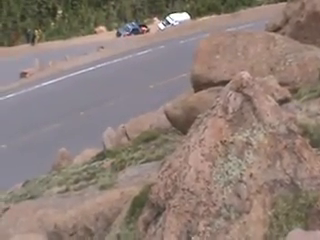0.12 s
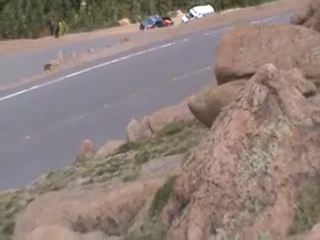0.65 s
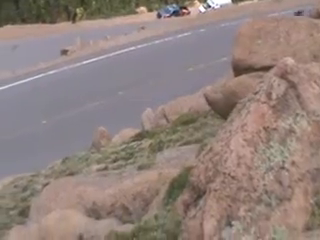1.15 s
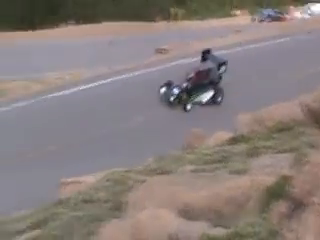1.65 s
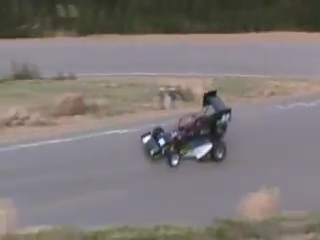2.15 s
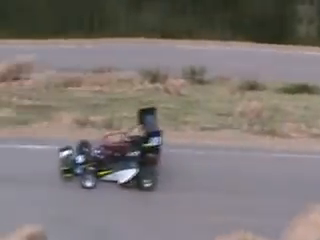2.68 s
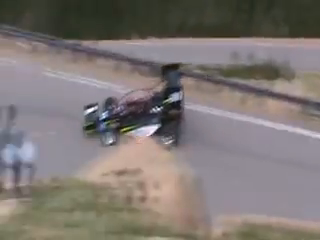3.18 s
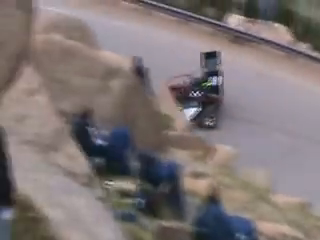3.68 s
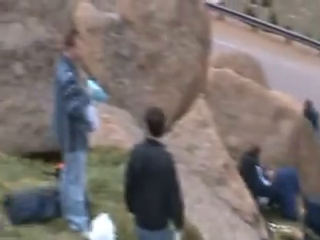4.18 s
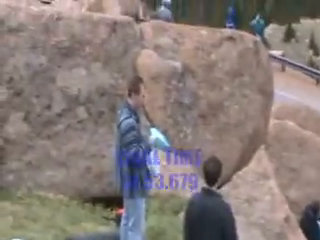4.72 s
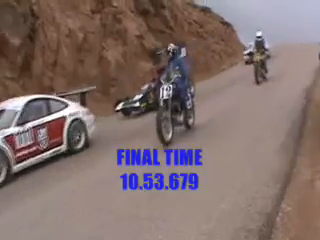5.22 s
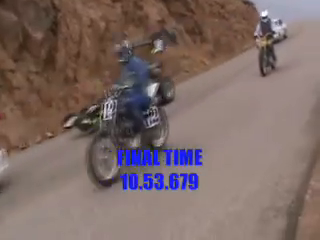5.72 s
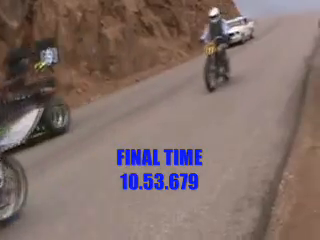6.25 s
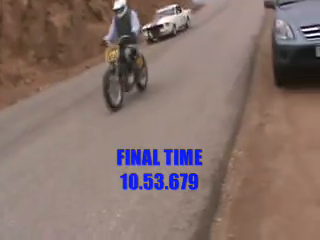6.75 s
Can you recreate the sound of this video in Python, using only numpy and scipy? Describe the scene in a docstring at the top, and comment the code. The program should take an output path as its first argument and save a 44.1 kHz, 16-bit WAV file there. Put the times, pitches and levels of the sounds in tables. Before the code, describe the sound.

Open air beside a mountain road, handheld stereo microphone with a dull top end. From 0 s a race engine drones, muffled behind rocks, under low wind thumps strongest until about 1.5 s. It grows louder and brighter from 1.2 s, a hard rasp with pulsing exhaust hiss, its pitch climbing to 2.26 s. At 2.3 s it drops abruptly in a downshift; crackles snap at 2.6 s, thin whines slide downward and the revs sink to a rough growl near 3.5 s. From 3.7 s it pulls again, rising, with a crackle at 4.06 s, then dulls away as wind buffets around 4.5 s. Near-silence from 4.7 to 5.04 s. Then a slow car's low drone and a puttering motorcycle pass close, exhaust pops clustered at 5.1-5.4 s, with steady road rumble and hiss. Gravel ticks from 6.2 s, one sharp snap at 6.6 s, ending about 6.87 s.

```python
"""A race car brakes into a hairpin below a rocky bank, changes down and pulls away; wind puffs on the microphone.
After a short silent cut, a car and motorcycles cruise slowly past at close range with a low drone.
Engines are sums of orders with scattered phases; the race car's upper orders pass through pipe resonances.
Gas, wind and road are coloured noise; backfires and stones are noise bursts, pops and stone rings resonances."""
import sys
import numpy as np
from scipy import signal
from scipy.fft import rfft, irfft, next_fast_len
from scipy.io import wavfile
from scipy.ndimage import uniform_filter1d

SR = 44100
rng = np.random.default_rng(int(sys.argv[2]) if len(sys.argv) > 2 else 0)


def bounce(signal):
    """Save signal as a 16-bit WAV file at the path given by the first command-line argument."""
    frames = np.transpose(np.atleast_2d(signal))
    limited = np.clip(frames, -1, 1)
    pcm = np.round(limited * 32767).astype(np.int16)
    wavfile.write(sys.argv[1], SR, pcm)


def amplitude_ratio(level_db):
    """Convert a level in decibels to the matching linear amplitude (field) ratio."""
    exponent = np.asarray(level_db, float) / 20
    return 10 ** exponent


N = 302967
TIME = np.arange(N) / SR
CONTROL_S = TIME[::16]   # times of the slow controls
CUT_OUT_S, CUT_IN_S = 4.713, 5.0445
HALVES = np.array([[.5], [-.5]])   # splits a left-right difference over the channels

# left-right balance: (time [s], middle L-R [dB], treble L-R [dB])
PAN = [(0, -3.5, -1), (2.4, -3, 0), (4.2, -2.5, -1), (4.71, -1.5, 2), (5.05, 3.5, 4.5), (5.68, 0.5, 2.5),
       (6.87, 3.5, 2.5)]
# how loud the race car arrives: (time [s], pipe level [dB], hiss gain [dB], treble gain [dB])
PASSING = [(0, -45, -42, -64), (.14, -38, -33, -66), (.3, -39, -35, -59), (.44, -35, -38, -51.5),
           (.64, -24.5, -35, -52.5), (1.0, -26.5, -30.5, -45), (1.17, -27.5, -29.5, -35.5),
           (1.4, -21, -28.5, -40.5), (1.8, -27, -26, -32.5), (1.97, -24.5, -25.5, -30.5),
           (2.25, -25.5, -26.5, -30), (2.52, -28, -26, -28.5), (2.68, -24.5, -25.5, -28.5),
           (3.3, -26, -25, -25.5), (3.6, -25, -24.5, -29.5), (3.8, -22, -25, -25.5),
           (3.93, -25.5, -26.5, -26), (4.12, -21.5, -29, -29.5), (4.45, -28, -36.5, -37),
           (4.71, -28, -36, -36)]


def rms_one(x):
    """Scale to unit power."""
    return x / np.sqrt(np.mean(x ** 2) + 1e-20)


def in_time(rows, t=TIME):
    """Columns of a curve table read at times t."""
    s, *columns = np.transpose(rows)
    return [np.interp(t, s, c) for c in columns]


def at_hz(points, hz):
    """A spectrum read on a log-frequency axis."""
    points_hz, values = np.transpose(points)
    return np.interp(np.log(hz), np.log(points_hz), values)


def smooth(coarse, size):
    """A slow control read at every sample."""
    return uniform_filter1d(np.repeat(coarse, 16, axis=-1), size=16, axis=-1)[..., :size]


def drift(rate_hz, size=N, step=40):
    """Slow chance: noise twice through a one-pole low-pass, spread 1."""
    r = np.exp(-2 * np.pi * step * rate_hz / SR)
    noise = rng.standard_normal(N // step + 2002)
    slow = signal.lfilter([1], [1, -2 * r, r * r], noise)[2000:]   # skip the start-up
    return np.interp(np.linspace(0, N / step, size), np.arange(len(slow)), rms_one(slow))


def coarse_drift(rate_hz, count):
    """Slow chance at the control rate."""
    return drift(rate_hz, size=N // 16 + 1)[:count]


def orders(turns, levels_db, scatter, flutter_db, lead_rad):
    """One partial per engine order; uneven firing scatters the phases, the air path shakes the levels."""
    out, size = np.zeros((2, len(turns))), len(turns)
    timing = drift(20, size=N // 16 + 1)   # early or late firing moves all orders together
    strength = drift(14, size=N // 16 + 1)   # strong and weak firings come in uneven runs
    for order, level_db in levels_db:
        count = len(level_db)
        flutter, jitter, path = [coarse_drift(rate_hz, count) for rate_hz in (5, 28, 3)]
        # high orders feel timing errors most
        jitter = scatter * (.85 * np.sqrt(order / 15) * jitter + .4 * order / 15 * timing[:count])
        apart = (lead_rad + 0.25 * path) * HALVES   # the two ports hear slightly different paths
        # from order 18 up the rasp pulses between the barks; low orders stay out of the pulse
        offset_turns = .45 * max(order - 17, 0)
        offset_turns += rng.normal(0, .06 + (order / 60) ** 2 + .2 * (order < 10))
        phase = smooth(jitter + apart, size) + 2 * np.pi * ((order * turns + offset_turns) % 1)
        shake_db = flutter_db * min(order / 15 + .3, 1.3) * flutter   # low orders hold steadier
        shake_db = shake_db + 3.0 * (order >= 10) * np.sqrt(scatter) * strength[:count]
        level = smooth(np.sqrt(2) * amplitude_ratio(level_db + shake_db), size)
        out += level * np.sin(phase.astype(np.float32))
    return out


def rush(colour, knots_hz, levels_db, pan_db, patchy_db, pulse):
    """Coloured stereo noise in half-octave bands; band levels follow curves pinned at the knots."""
    # (frequency [Hz], left-right likeness [0 to 1])
    likeness = [(60, 0.27), (130, 0.15), (280, 0.34), (590, 0.52), (1270, 0.86), (2720, 0.96), (5830, 0.81),
                (9000, 0.4), (11500, 1)]
    size = next_fast_len(N)
    hz = np.maximum(np.fft.rfftfreq(size, 1 / SR), 10)
    alike = np.clip(at_hz(likeness, hz), 0, 1)
    mid, side = rfft(rng.standard_normal((2, size))) * amplitude_ratio(at_hz(colour, hz))
    ears = np.sqrt(1 + alike) * mid + np.sqrt(1 - alike) * side * [[1], [-1]]
    reference = ears[:, (hz > 2000) & (hz < 6000)]   # this band is set to rms 1
    ears = ears / np.sqrt(np.mean(abs(reference) ** 2) * 8000 / size / SR)
    out, together = 0, drift(7.4, size=N // 16 + 1)
    for centre_hz in 32 * 2 ** np.arange(0, 9.1, .5):
        share = np.cos(np.pi * np.clip(np.log2(hz / centre_hz), -.5, .5))
        place = np.interp(np.log(centre_hz), np.log(knots_hz), np.arange(len(knots_hz)))
        low = min(int(place), len(knots_hz) - 2)
        level_db = levels_db[low] + (place - low) * (levels_db[low + 1] - levels_db[low])
        level_db = level_db + patchy_db * (together + 2.0 * drift(14.0, size=len(CONTROL_S)))
        gain = amplitude_ratio(level_db + pan_db[int(centre_hz > 1500)] * HALVES)
        out = out + smooth(gain, N) * irfft(ears * share ** 2, size)[:, :N]
    return out * pulse


def cracks(events, decay_s, low_hz, high_hz):
    """Band-limited noise bursts with a sharp front and exponential decay."""
    starts = np.full(N, 1e-18)
    s, db = np.transpose(events)
    starts[(s * SR).astype(int)] = amplitude_ratio(db)
    envelope = signal.lfilter([1], [1, -np.exp(-1 / (decay_s * SR))], starts)
    band = signal.butter(3, [low_hz, high_hz], "band", fs=SR, output="sos")
    burst = signal.sosfilt(band, envelope * rng.standard_normal(N))
    return rms_one(burst) * np.sqrt(np.mean(envelope ** 2))


def rings(events, hz, t60_s):
    """Each event sets one two-pole resonance ringing."""
    clicks = np.full(N, 1e-18)
    s, db = np.transpose(events)
    clicks[(s * SR).astype(int)] = amplitude_ratio(db)
    r, w = amplitude_ratio(-60 / (t60_s * SR)), 2 * np.pi * hz / SR
    return signal.lfilter([0, np.sin(w)], [1, -2 * r * np.cos(w), r * r], clicks)


def ripple(pattern, count=100):
    """How far each order stands above or below its neighbours; beyond the table it is left to chance."""
    db = np.array(pattern)[:, 1].astype(float)
    known = db - uniform_filter1d(db, size=7, mode="nearest")
    return np.append(known, rng.normal(0, 2.2, count - len(db)))


def firing_patterns(coarse):
    """Order ripple as load and heading change; returns a function from order to dB over time."""
    # firing patterns of the cylinders: (order, level [dB])
    behind_rocks = [(1, -11), (2, 0), (3, -8), (4, -19), (5, -6), (6, -16), (7, -20), (8, -7), (9, -19),
                    (10, -8), (11, -12), (12, -16), (13, -10), (14, -5), (15, -5), (16, -14), (17, -21),
                    (18, -19), (19, -17), (20, -19), (21, -17), (22, -21), (23, -21), (24, -14), (25, -20),
                    (26, -15), (27, -17), (28, -21), (29, -21), (30, -15), (31, -19), (32, -15), (33, -20),
                    (34, -21), (35, -15), (36, -21), (37, -20), (38, -16)]
    pulling = [(1, -14), (2, -3), (3, -4), (4, -13), (5, 0), (6, -11), (7, -15), (8, -4), (9, -10),
               (10, -6), (11, -4), (12, -2), (13, -5), (14, -14), (15, -9), (16, -8), (17, -17), (18, -16),
               (19, -17), (20, -12), (21, -16), (22, -17), (23, -13), (24, -15), (25, -14), (26, -13),
               (27, -14), (28, -10), (29, -16), (30, -16), (31, -18), (32, -18), (33, -18), (34, -18),
               (35, -12), (36, -12), (37, -12), (38, -16)]
    overrun = [(1, -19), (2, -8), (3, -5), (4, -10), (5, -5), (6, -15), (7, -13), (8, -8), (9, -5),
               (10, -9), (11, -8), (12, -4), (13, 0), (14, 0), (15, -5), (16, -7), (17, -5), (18, -12),
               (19, -7), (20, -10), (21, -11), (22, -6), (23, -7), (24, -7), (25, -9), (26, -15), (27, -10),
               (28, -13), (29, -16), (30, -16), (31, -14), (32, -10), (33, -8), (34, -16), (35, -9),
               (36, -10), (37, -13), (38, -13)]
    leaving = [(1, -14), (2, -5), (3, -2), (4, -15), (5, -6), (6, -12), (7, -7), (8, -9), (9, -8),
               (10, -15), (11, -5), (12, -7), (13, 0), (14, -6), (15, -6), (16, -2), (17, -3), (18, -12),
               (19, -11), (20, -16)]
    # orders that stand out on the overrun: (order, boost [dB])
    whining = [(17, 3), (22, 4), (35, 3)]
    # which pattern holds: (time [s], 0 behind rocks, 1 pulling, 2 overrun, 3 leaving)
    stages = [(1.1, 0), (1.3, 1), (2.26, 1), (2.4, 2), (3.5, 2), (3.85, 3)]
    patterns = np.array([ripple(p) for p in (behind_rocks, pulling, overrun, leaving)])
    patterns[2] += [dict(whining).get(order, 0) for order in range(1, 101)]
    stage = in_time(stages, coarse)[0]
    return lambda order: np.interp(stage, range(4), patterns[:, order - 1])


def race_engine(coarse, speed, uneven, turns):
    """Low orders follow the exhaust beat, the others pass through five pipe resonances."""
    # exhaust pipe as the car turns: (time [s], bark [Hz], growl [Hz], snarl [Hz],
    # then rasp, growl, snarl, whine above the bark [dB])
    pipe = [(0, 600, 1290, 1950, -3, -1, 0, 2), (.25, 660, 1380, 1880, -8, -3, -4, -3),
            (.45, 630, 1450, 1880, -5, -9, -6, -5.5), (.66, 680, 1500, 1920, -10.5, -9, -7.5, -11.5),
            (.95, 700, 1550, 1950, -1.5, -4, -0.5, -3.5), (1.15, 690, 1560, 2100, -5.5, -6, -2.5, -2),
            (1.4, 660, 1510, 1950, -7.5, -8, -9.5, -12), (1.6, 650, 1480, 1960, -18, -6, -6.5, -6.5),
            (1.8, 650, 1500, 1930, -5.5, -2, -2, -3.5), (2.0, 600, 1520, 2000, -5.5, -7, -7, -4.5),
            (2.2, 520, 1450, 2040, -2.5, -7, -6.5, -10.5), (2.35, 520, 1520, 2240, -8, -2, -3.5, -7),
            (2.44, 820, 1630, 2050, 0.5, -1.5, -1.5, -7), (2.55, 820, 1650, 2080, 3, -1, -2, 1.5),
            (2.64, 640, 1580, 2140, -9, -4, -7, -4), (2.94, 590, 1560, 2150, -4, -9, -9, -5),
            (3.2, 550, 1530, 2280, 0.5, -3, -4, -3.5), (3.45, 530, 1510, 2220, -0.5, -2, -3.5, -4.5),
            (3.62, 570, 1480, 2260, -2, -6, -5, -6), (3.8, 590, 1570, 2200, -2.5, -7.5, -5.5, -9),
            (3.95, 640, 1550, 2050, -2, -5, -4, -3.5), (4.15, 600, 1590, 2020, -10, -11.5, -12.5, -13),
            (4.71, 560, 1500, 2000, -7.5, -12, -10.5, -15)]
    # centre of the rasp: (time [s], frequency [Hz])
    rasp = [(0, 945), (.45, 950), (.66, 1050), (.9, 1180), (1.3, 1250), (1.6, 1120), (2.5, 1050),
            (3.0, 1020), (3.3, 910), (3.55, 890), (3.75, 1060), (4.1, 1165), (4.71, 1080)]
    # exhaust beat as load and heading change: (time [s], levels of orders 2, 3, 4, 5, 8, 10 [dB])
    beat_levels = [(0, -32.5, -36, -45, -48, -61, -46), (.15, -22, -29, -44, -28, -44.5, -42.5),
                   (.47, -22, -32, -51, -27.5, -34.5, -32), (.72, -21.5, -29.5, -34, -28, -27, -28),
                   (1.0, -21.5, -29, -38, -28, -32.5, -28.5),
                   (1.32, -19.5, -30.5, -35.5, -23.5, -28.5, -33.5),
                   (1.55, -29, -38, -41.5, -22, -30.5, -34.5), (1.8, -29, -33, -40, -25.5, -29, -34),
                   (2.0, -32.5, -25.5, -34, -29.5, -26.5, -26.5), (2.26, -30, -26, -33, -25.5, -24, -25),
                   (2.3, -33, -27, -28, -20.5, -33, -31), (2.38, -35, -26, -26, -25.5, -32, -28.5),
                   (2.48, -36, -32.5, -26.5, -32.5, -33, -31.5), (2.75, -38.5, -31, -36.5, -29.5, -35, -35),
                   (3.05, -33, -33, -45, -33, -39, -46), (3.3, -40, -36, -47, -41.5, -35.5, -50),
                   (3.42, -43.5, -41, -46, -40, -32.5, -44.5), (3.55, -43, -41, -47, -35, -25, -34),
                   (3.8, -32, -32, -46.5, -39.5, -28.5, -39), (4.0, -40, -30.5, -46, -36.5, -38, -45),
                   (4.33, -33, -30, -41, -32.5, -35.5, -39), (4.71, -26, -29, -32, -32, -31.5, -39)]
    # the orders of those columns
    beat_orders = (2, 3, 4, 5, 8, 10)
    beats = in_time(beat_levels, coarse)
    pipe_db = in_time(PASSING, coarse)[0]
    bark_hz, growl_hz, snarl_hz, *upper_db = in_time(pipe, coarse)
    centres_hz = [bark_hz, in_time(rasp, coarse)[0], growl_hz, snarl_hz, 2730]   # last: whine
    widths_hz = [230, 325, 320, 480, 930]
    # each resonance swells and sinks by itself
    gains_db = [db + 0.88 * coarse_drift(5.0, len(coarse)) for db in [0] + upper_db]
    pattern_db = firing_patterns(coarse)
    levels = list(zip(beat_orders, beats))
    for order in sorted(set(range(2, 90)) - set(beat_orders)):
        power = 0
        for centre_hz, db, width_hz in zip(centres_hz, gains_db, widths_hz):
            detune = (order * speed - centre_hz) / width_hz * 2
            power = power + amplitude_ratio(2 * (pipe_db + db)) * speed / width_hz / (1 + detune ** 4)
        if order < 10:   # weak low orders hang under the stronger of orders 5 and 8
            power = power + amplitude_ratio(2 * (np.maximum(beats[3], beats[4]) - 9.5))
        levels.append((order, 10 * np.log10(power) + pattern_db(order)))
    pan_db = in_time(PAN)[0][:len(turns)] * HALVES
    return orders(turns, levels, uneven, flutter_db=2.4, lead_rad=0.85) * amplitude_ratio(pan_db)


def high_order_whines(turns):
    """Thin high whines at fixed multiples of the cycle rate slide with the revs."""
    # (multiple of the cycle rate, time [s], half-length [s], level [dB])
    whines = [(36, 1.75, .4, -34), (43, 1.03, .1, -33), (32.7, 2.72, .15, -30), (35.5, 2.75, .12, -32),
              (35.7, 3.1, .12, -35), (45, 2.68, .12, -35), (58, 3.15, .15, -35), (48.2, 2.92, .15, -33),
              (55.3, 3.04, .22, -32), (61.2, 2.92, .12, -34), (67.6, 3.06, .2, -30), (59.5, 2.85, .1, -33),
              (92.5, 3.12, .2, -35)]
    t, out = TIME[:len(turns)], 0
    for multiple, s, half_s, db in whines:
        swell = amplitude_ratio(db) * np.exp(-((t - s) / half_s) ** 4)
        out = out + swell * np.sin(2 * np.pi * multiple * turns + .25 * drift(15)[:len(t)])
    return np.sqrt(2) * out


def gas_puffs(turns, uneven):
    """Gas comes in puffs: gain swinging at a few engine orders, with jittered phase."""
    # (order, depth)
    puffs = [(1, .17), (3, .08), (4, .1), (5, .25)]
    size, pulse = len(turns), 1
    for order, depth in puffs:
        jitter = smooth(uneven, size) * drift(28)[:size]
        pulse = pulse + depth * np.cos(2 * np.pi * order * turns + jitter)
    return pulse


def racer():
    """Engine orders and thin high whines run from one integrated speed curve, which also pulses the gas."""
    # race engine: (time [s], cycle rate [1/s], firing unevenness [scale of phase scatter])
    revs = [(0, 44.3, .8), (.12, 48.5, .6), (.28, 45.9, .42), (.47, 47.1, .42), (.92, 51.1, .4),
            (1.11, 51.1, .55), (1.31, 52.3, .33), (1.68, 54.7, .33), (1.99, 56.4, .31), (2.265, 56.7, .33),
            (2.32, 51, .6), (2.4, 51.6, .35), (2.47, 52, .3), (2.58, 50.8, .4), (2.75, 47.5, .34),
            (3.0, 42.9, .3), (3.08, 42.6, .3), (3.25, 39.3, .4), (3.53, 33.2, 1), (3.61, 33.2, 1.1),
            (3.71, 34.1, 1.3), (3.8, 38.3, 1.3), (3.93, 41.4, 1.1), (4.08, 42, .85), (4.43, 42.9, 1.1),
            (4.71, 41.6, 1.5)]
    coarse = TIME[:int((CUT_OUT_S + .05) * SR):16]
    speed, uneven = in_time(revs, coarse)
    turns = np.cumsum(np.interp(TIME[:16 * len(coarse)], coarse, speed)) / SR
    tone = race_engine(coarse, speed, uneven, turns) + high_order_whines(turns)
    pulse = gas_puffs(turns, uneven)
    rest = N - len(turns)
    return np.pad(tone, ((0, 0), (0, rest))), np.pad(pulse, (0, rest), "edge")


def race_gas(pulse, pan_db):
    """Exhaust rush: coloured noise pulsed by the engine, with brief swells and dips."""
    # (frequency [Hz], relative density [dB])
    colour = [(500, -20), (1050, -20), (1500, -14), (1760, -17), (2200, -12), (2800, -9), (3050, -13),
              (3400, -6), (3800, -3.5), (5780, -10), (7100, -17), (7440, -68), (7870, -19), (8580, -17),
              (10600, -19), (12000, -24), (12400, -39), (13000, -95)]
    # the rush swells or sinks briefly: (time [s], change [dB])
    surges = [(1.15, 2), (1.8, 1), (2.09, 4), (2.32, 2), (2.61, 4.5), (2.77, 1.8), (3.17, 1.5), (3.28, -2),
              (3.44, 2.5), (3.6, 1), (3.93, 1.5), (4.07, 3), (4.33, 2.5)]
    hiss_db, treble_db = in_time(PASSING, CONTROL_S)[1:]
    surge_db = sum(db * np.exp(-((CONTROL_S - s) / 0.043) ** 2) for s, db in surges)
    levels_db = [hiss_db + surge_db, treble_db + 1.8 * surge_db]   # the treble swells more
    return rush(colour, [6000, 8000], levels_db, pan_db, 0.63, pulse)


def backfires():
    """Exhaust crackle: very short bright noise bursts."""
    # (time [s], level [dB])
    crackles = [(2.5965, -17), (2.6165, -16), (4.0605, -20)]
    return cracks(crackles, 0.0018, 2500, 12000)


def wind():
    """Lumpy low noise, its own on each microphone port; each gust rises out of the calm and falls back."""
    # (time [s], peak level [dB], time to fall 10 dB [s])
    gusts = [(.06, -23, .12), (.23, -21.5, 0.1), (.6, -20, 0.3), (1.15, -19, 0.3), (1.5, -32, 0.5),
             (1.78, -26, 0.2), (1.93, -30, 0.4), (2.3, -31, 0.3), (2.78, -32, .15), (3.65, -36, .1),
             (4.07, -26, 0.2), (4.32, -27, .12), (4.54, -17, 0.1), (4.71, -16, 0.2)]
    calm_db = -40
    shapes_db = [np.maximum(db - 10 * abs(TIME - s) / fall_s, calm_db) for s, db, fall_s in gusts]
    level_db = np.max(shapes_db, axis=0)
    band = signal.butter(2, [36, 150], "band", fs=SR, output="sos")
    low = signal.sosfilt(band, rng.standard_normal((2, N)))
    return rms_one(low) * amplitude_ratio(level_db + 0.84 * np.array([drift(27.0), drift(30.0)]))


def cruising(curve, pattern, loudest, rough):
    """A slow engine whose orders keep one pattern around the loudest."""
    start = int(CUT_IN_S * SR) // 16 * 16
    speed, level_db = in_time(curve, TIME[start::16])
    levels = [(order, level_db + db - dict(pattern)[loudest]) for order, db in pattern]
    turns = np.cumsum(np.repeat(speed, 16)[:N - start]) / SR
    tone = orders(turns, levels, rough, flutter_db=1.04, lead_rad=0.16)
    return np.pad(tone, ((0, 0), (start, 0)))


def cruising_car():
    """Slow car engine, set by the level of order 2."""
    # (time [s], cycle rate [1/s], order 2 level [dB])
    curve = [(5.08, 60.4, -23), (5.3, 64.9, -18), (5.69, 62.4, -16), (5.99, 67.2, -20), (6.15, 66.6, -15),
             (6.38, 65.2, -20), (6.53, 65.9, -15), (6.65, 68.2, -19), (6.83, 69.6, -16)]
    # (order, relative level [dB])
    pattern = [(1, -10.5), (2, 2), (3, -13.5), (4, -12.5), (5, -11), (6, -17.5), (7, -16.5), (8, -18.5),
               (9, -51.5), (10, -34)]
    return cruising(curve, pattern, 2, rough=0.4)


def motorcycle():
    """Slow motorcycle engine, set by the level of order 4."""
    # (time [s], cycle rate [1/s], order 4 level [dB])
    curve = [(5.05, 47.9, -22), (5.3, 48.1, -21), (5.4, 46.3, -27), (5.53, 45.9, -21), (5.75, 45.2, -25),
             (6.01, 48, -20), (6.2, 44.4, -28), (6.33, 44.1, -23), (6.42, 44.7, -29), (6.87, 42.7, -30)]
    # (order, relative level [dB])
    pattern = [(1, -9.5), (2, 2), (3, -11), (4, 5.5), (5, -3), (6, -8.5), (7, -10), (8, -14), (9, -19),
               (10, -11)]
    return cruising(curve, pattern, 4, rough=0.5)


def pops():
    """Loud motorcycle exhaust pops, and small ones at random; each rings the pipe and an overtone."""
    # (time [s], level [dB])
    loud_pops = [(5.1, -11), (5.1725, -17), (5.2195, -19), (5.249, -24), (5.418, -17), (5.818, -22),
                 (6.505, -18)]
    pipe_hz, t60_s, pops_per_s = 560, 0.019, 40
    chance = rng.random((int(pops_per_s * 1.8), 2))
    small = np.c_[CUT_IN_S + 1.8 * chance[:, 0], -31 + 10 * chance[:, 1]]
    events = np.r_[loud_pops, small]
    return rings(events, pipe_hz, t60_s) + amplitude_ratio(-6.5) * rings(events, 1.8 * pipe_hz, 0.55 * t60_s)


def gravel():
    """Stones under the tyres: a noise burst and a short ring each."""
    # (time [s], level [dB])
    stones = [(5.109, -35), (6.244, -31), (6.3479, -23.5), (6.41, -30.5), (6.432, -32), (6.4646, -27),
              (6.5175, -26.5), (6.6204, -31), (6.632, -29.5), (6.686, -32)]
    return cracks(stones, 0.0036, 900, 4400) + amplitude_ratio(5.0) * rings(stones, 1250, 0.027)


def grit():
    """Small stones tick under the tyres at random."""
    ticks_per_s = 30
    chance = rng.random((int(ticks_per_s * 1.8), 2))
    events = np.c_[CUT_IN_S + 1.8 * chance[:, 0], -40 + 8.0 * chance[:, 1]]
    return cracks(events, .002, 1200, 5500)


def snap():
    """One bright snap: a sub-millisecond decay of wide-band noise."""
    # (time [s], level [dB])
    snaps = [(6.6008, -17)]
    return cracks(snaps, 0.00066, 500, 9000)


def slow_traffic(pan_db):
    """Low drone and road hiss as steady coloured noise."""
    # (time [s], rumble gain [dB], hiss gain [dB], treble gain [dB])
    gains = [(5.05, -33.5, -39, -31.5), (5.4, -35.5, -39.5, -30.5), (6.5, -35, -39, -28),
             (6.87, -34.5, -36, -29)]
    # (frequency [Hz], relative density [dB])
    colour = [(15, -52), (25, -23.5), (137, -6), (173, -10), (333, -11.5), (421, -22), (769, -22),
              (1370, -35.5), (4550, -38.5), (5910, -50), (7280, -59), (9710, -62), (11100, -65.5),
              (12000, -83), (13000, -115), (16800, -145), (22000, -120)]
    return rush(colour, [500, 5000, 8000], in_time(gains, CONTROL_S), pan_db, 0.44, 1)


def scene():
    """Two views joined by a hard cut with silence between."""
    pan_db = in_time(PAN, CONTROL_S)
    tone, pulse = racer()
    hairpin = tone + race_gas(pulse, pan_db) + backfires() + wind()
    parade = cruising_car() + motorcycle() + pops() + gravel() + grit() + snap() + slow_traffic(pan_db)
    after_s = np.maximum(TIME - CUT_OUT_S, 0)
    tail = amplitude_ratio(-14.0 - 260.0 * after_s) * (after_s < .042)   # a faint tail lingers after the cut
    fade = np.where(after_s > 0, tail, 1)
    return hairpin * fade + parade * (TIME >= CUT_IN_S)


def top_cut(x):
    """Nothing passes above the cut-off."""
    return signal.sosfilt(signal.butter(12, 13100, fs=SR, output="sos"), x)


def record(dry):
    """A narrow gap is cut in the treble, peaks are gently rounded and the top is cut."""
    gap = signal.butter(2, [7200, 7850], "stop", fs=SR, output="sos")
    rounded = 1.68 * np.tanh(signal.sosfilt(gap, dry) / 1.509)
    top = signal.cheby2(16, 50, 12900, fs=SR, output="sos")
    mix = signal.sosfilt(top, rounded)
    return top_cut(mix)


dry = scene()
out = record(dry)
bounce(out)
```